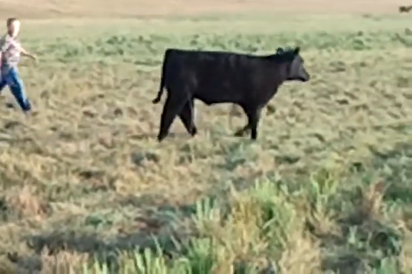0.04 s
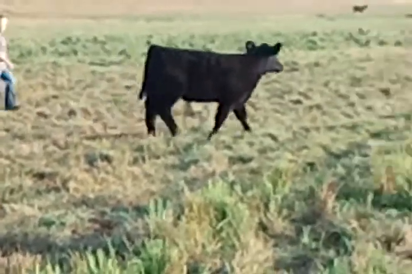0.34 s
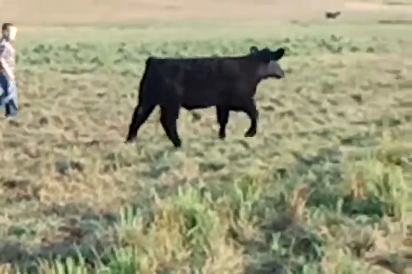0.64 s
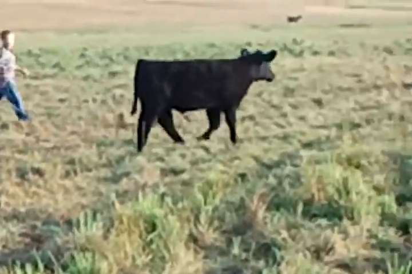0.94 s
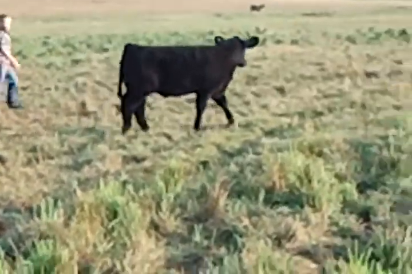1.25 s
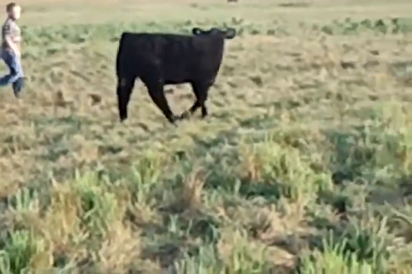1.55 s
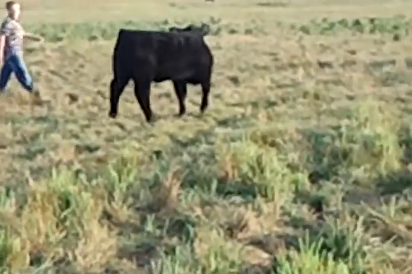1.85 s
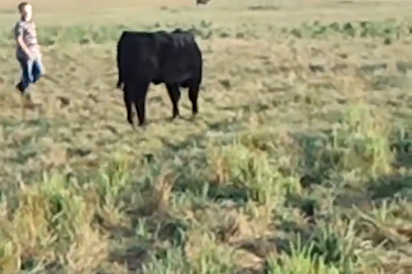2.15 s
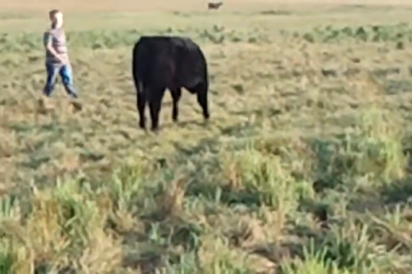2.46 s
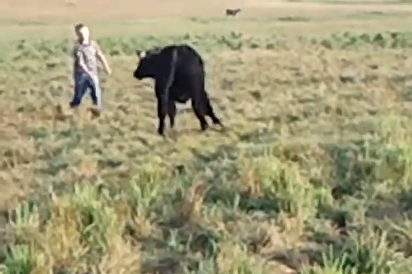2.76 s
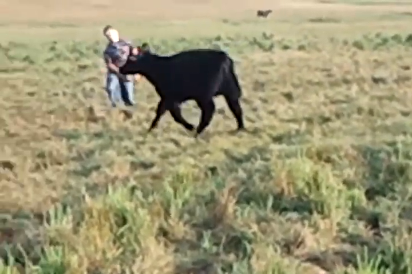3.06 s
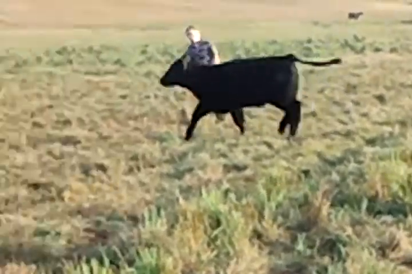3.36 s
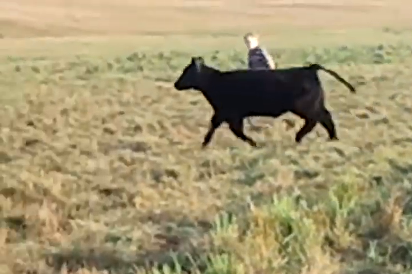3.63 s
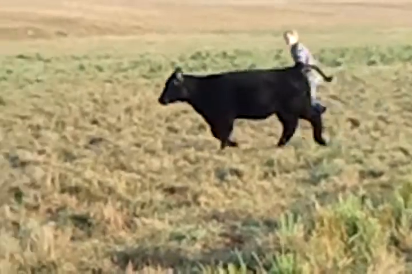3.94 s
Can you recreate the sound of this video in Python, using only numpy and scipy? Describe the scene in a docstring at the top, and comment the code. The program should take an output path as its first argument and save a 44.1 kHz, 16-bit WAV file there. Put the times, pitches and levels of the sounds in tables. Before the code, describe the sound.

Two cattle moo in an open pasture: a low raspy call, two higher, clearer calls with hoarse edges, then the low one again. Behind them are a steady high hiss, light wind and a soft, engine-like throb.

```python
"""Two cattle call in turn across an open pasture, twice each: one low and raspy, one higher and clearer.
Vocal-fold pulses and puffs of turbulence sound through the throat; each call rises, holds and sags.
The higher voice carries a nasal hum and breaks into a hoarse squeal at its ends.
Behind them: faint far moos, a steady high hiss, light wind that nudges the microphone once,
a low regular throb like a far idling engine, and one dry tick."""
import sys
import numpy as np
from scipy import signal
from scipy.fft import rfft, irfft, next_fast_len
from scipy.io import wavfile
from scipy.ndimage import map_coordinates

SR = 44100
rng = np.random.default_rng(int(sys.argv[2]) if len(sys.argv) > 2 else 0)


def master(y):
    """Save y as 16-bit WAV."""
    cut = np.clip(np.atleast_2d(y).T, -1, 1)
    pcm = np.round(cut * 32767)  # scale
    wavfile.write(sys.argv[1], SR, pcm.astype(np.int16))


N = 176400


def amp(db):
    """Decibels to gain."""
    return 10 ** (np.asarray(db) / 20)


def unit(x):
    """Scale to rms 1."""
    return x / np.sqrt(np.mean(x ** 2) + 1e-20)


def clock():
    """Sample times in seconds."""
    return np.arange(N) / SR


def along(points, hz):
    """Gain of (Hz, dB) points on a log axis."""
    point_hz, db = np.transpose(points)
    return amp(np.interp(np.log(hz + 1), np.log(point_hz + 1), db))


def peak(hz, centre_hz, half_width_hz):
    """Gain of one resonance."""
    return 1 / (1 + ((hz - centre_hz) / half_width_hz) ** 2)


def curves(rows):
    """One value per sample for each column after the time."""
    times_s, *columns = np.transpose(rows)
    return [np.interp(clock(), times_s, column) for column in columns]


def wobble(rate_hz):
    """Smooth random curve, rate_hz knots a second."""
    return map_coordinates(rng.standard_normal(4000), [clock() * rate_hz], mode="wrap")


def swell(start_s, length_s):
    """Half-sine rise and fall."""
    return np.sin(np.pi * np.clip((clock() - start_s) / length_s, 0, 1))


def filtered(x, gain):
    """Minimum-phase filter with the given gain over frequency."""
    size = 2 * next_fast_len(N // 2 + 8192)
    hz = np.fft.rfftfreq(size, 1 / SR)
    cepstrum = irfft(np.log(np.maximum(gain(hz), 1e-6)))
    cepstrum[1:size // 2] *= 2
    cepstrum[size // 2 + 1:] = 0
    return irfft(rfft(x, size) * np.exp(rfft(cepstrum)))[:N]


def noise(spectrum):
    """Coloured noise of rms 1."""
    return unit(filtered(rng.standard_normal(N), lambda f: along(spectrum, f)))


# Hiss colour (frequency [Hz], gain [dB])
HISS_SPECTRUM = [(1650, -39.5), (2800, -34), (3170, -21), (3540, -8.5), (3900, -5), (4140, 3), (4610, 7.5),
                 (5100, 4), (5610, -5.5), (6150, -0.5), (6630, -4.5), (6870, -4.5), (7270, -20),
                 (9450, -75.5), (16000, -120)]
# Hiss envelope (time [s], level [dB])
HISS_ENVELOPE = [(0.04, -47.5), (0.45, -51), (0.78, -52.5), (1.79, -57.5), (2.32, -57.5), (2.98, -54),
                 (3.28, -56), (3.96, -56)]


def hiss():
    """Continuous high band of noise."""
    return amp(curves(HISS_ENVELOPE)[0]) * noise(HISS_SPECTRUM)


# Moving air (frequency [Hz], gain [dB])
AIR_SPECTRUM = [(88, -29), (150, -6.5), (206, -7.5), (344, -7.5), (568, -11.5), (648, -12.5), (1270, -13.5),
                (1320, -13), (3500, -21), (4550, -30), (7700, -120)]
# Wind rumble (frequency [Hz], gain [dB])
RUMBLE_SPECTRUM = [(15, -3), (40, -5), (70, 5.5), (130, -6), (200, -18.5), (400, -37)]
# Envelope of air and rumble (time [s], gain [dB])
WIND_ENVELOPE = [(0, -48), (.5, -49), (.8, -54), (1.3, -55), (1.8, -58), (2.3, -58), (2.9, -54), (3.5, -56),
                 (4, -56)]


def wind():
    """Light wind: broad air noise over a fluctuating rumble."""
    envelope = amp(curves(WIND_ENVELOPE)[0] + 0.23 * wobble(21))
    rumble = amp(4 + 2 * wobble(10)) * noise(RUMBLE_SPECTRUM)
    return envelope * (noise(AIR_SPECTRUM) + rumble)


# Wind bump (frequency [Hz], gain [dB])
BUMP_SPECTRUM = [(30, -25.5), (140, -5), (250, -1.5), (400, -36.5), (800, -48)]


def wind_bump():
    """Wind nudges the microphone once."""
    return noise(BUMP_SPECTRUM) * amp(-49) * swell(start_s=0.355, length_s=0.1)


# Beat envelope (time [s], nominal peak [dB])
THROB_ENVELOPE = [(0, -43), (.6, -41), (1.1, -36), (1.5, -40.5), (2.6, -41), (4, -38)]
# Beat drift (time [s], lag [s])
THROB_DRIFT = [(0, -.003), (.4, -.01), (.9, -.002), (1.2, -.011), (1.55, -.015), (2, -.011), (3.1, .007),
               (3.5, -.006), (4, -.012)]
# Stronger thumps (time [s], peak [dB])
EXTRA_THUMPS = [(.076, -37), (.339, -39), (.428, -34), (1.06, -41), (3.922, -39)]


def throb(start_s=0.078, period_s=0.0897, pair_gap_s=0.018, tone_hz=70, sigma_s=0.0038):
    """Soft paired thumps, about eleven pairs a second, and a few stronger ones."""
    t, out, thumps = clock(), np.zeros(N), list(EXTRA_THUMPS)
    for k, (late, first, second) in enumerate(rng.standard_normal((44, 3))):
        at_s = start_s + k * period_s
        at_s += np.interp(at_s, *np.transpose(THROB_DRIFT)) + 0.001 * late
        db = np.interp(at_s, *np.transpose(THROB_ENVELOPE))
        thumps += [(at_s, db + 1.2 * first), (at_s + pair_gap_s, db - 1 + 2 * second)]
    for at_s, db in thumps:
        near = abs(t - at_s) < period_s / 2
        offset_s = t[near] - at_s
        window = np.exp(-(offset_s / sigma_s) ** 2 / 2)
        out[near] += amp(db) * window * np.cos(2 * np.pi * tone_hz * offset_s)
    return out


# Tick colour (frequency [Hz], gain [dB])
TICK_SPECTRUM = [(300, -11), (1000, -4), (2500, -25.5), (4000, 4), (5000, 2.5), (7000, -27)]


def tick(at_s=3.6055, level_db=-33, decay_s=0.0014):
    """One dry tick close by: a fast-decaying noise burst."""
    age_s = clock() - at_s
    return amp(level_db) * noise(TICK_SPECTRUM) * (age_s >= 0) * np.exp(-abs(age_s) / decay_s)


# Distant calls (start [s], length [s], start pitch [Hz], end pitch [Hz], peak [dB])
DISTANT_CALLS = [(1.444, 0.33, 348, 337, -61), (2.025, 0.22, 570, 600, -65), (2.17, 0.13, 590, 752, -63)]


def far_moos():
    """Faint wavering tones from animals far off."""
    out = np.zeros(N)
    for start_s, length_s, start_hz, end_hz, db in DISTANT_CALLS:
        glide_hz = np.interp(clock(), [start_s, start_s + length_s], [start_hz, end_hz])
        pitch_hz = glide_hz * (1 + 0.016 * wobble(43))
        out += amp(db) * swell(start_s, length_s) * np.sin(2 * np.pi * np.cumsum(pitch_hz) / SR)
    return out


def ground_scatter(x, t60_s=0.4, level_db=-14):
    """Weak scatter from the open ground."""
    t = np.arange(SR // 2) / SR
    tail = rng.standard_normal(len(t)) * amp(-60 * t / t60_s)
    return amp(level_db) * signal.fftconvolve(x, tail / np.linalg.norm(tail))[:N]


def gate(call, attack_s=0.017, release_s=0.026):
    """Linear attack before a call and release after it."""
    attack = np.clip(1 + (clock() - call[0][0]) / attack_s, 0, 1)
    release = np.clip(1 - (clock() - call[-1][0]) / release_s, 0, 1)
    return attack * release


def vocal_folds(pitch_hz, jitter, slack_jitter, waver=0.002):
    """Fold phase and slackness: the pitch wavers, and the cycles grow uneven as it sags."""
    slack = (1 - pitch_hz / pitch_hz.max()) * (np.arange(N) > pitch_hz.argmax())
    drift = waver * wobble(14) + (jitter + slack_jitter * slack) * wobble(170)
    return 2 * np.pi * np.cumsum(pitch_hz * (1 + drift)) / SR, slack


def pulses(phase, weight, count=18, swing_db=3.5):
    """Vocal pulses: harmonic k has nominal rms weight(k) and swings on its own in moving air."""
    harmonics = sum(weight(k) * amp(swing_db * wobble(11)) * np.cos(k * phase)
                    for k in range(1, count + 1))
    return np.sqrt(2) * harmonics * amp(1.4 * wobble(45))


def puffs(phase):
    """Turbulence let through once a cycle."""
    return unit(rng.standard_normal(N) * (1 + np.cos(phase)) ** 2)


# Breaks of the high voice (start [s], length [s], lower resonance [dB], upper resonance [dB])
VOICE_BREAKS = [(1.228, 0.15, -53, -60), (1.904, 0.77, -60, -67.5), (2.916, 0.12, -50, -58.5)]


def squeals(lower_hz=1232, upper_hz=2310):
    """Turbulence rings two throat resonances where the voice breaks."""
    lower = unit(filtered(rng.standard_normal(N), lambda f: peak(f, lower_hz, half_width_hz=50)))
    upper = unit(filtered(rng.standard_normal(N), lambda f: peak(f, upper_hz, half_width_hz=390)))
    return sum(swell(start_s, length_s) * (amp(lower_db) * lower + amp(upper_db) * upper)
               for start_s, length_s, lower_db, upper_db in VOICE_BREAKS)


# High calls, source levels
# (time [s], pitch [Hz], low harmonics [dB], treble [dB], hum [dB], throat resonance [Hz])
HIGH_CALL_1 = [(0.55, 186, -70, -70, -57, 1100), (0.68, 197, -63, -65, -55, 1100),
               (0.8, 208, -55.5, -58, -54, 1180), (0.915, 212.7, -52.5, -54.5, -53, 1170),
               (1.1, 213.7, -53, -51.5, -53, 1170), (1.195, 211.5, -51, -60, -52.5, 1060),
               (1.256, 207, -53, -61, -52, 1130), (1.3, 193, -57, -61, -64, 1190)]
HIGH_CALL_2 = [(2.0, 182, -81, -82, -73, 1230), (2.2, 189, -73, -73.5, -70, 1230),
               (2.33, 195.4, -70, -67, -56.5, 1230), (2.42, 203.5, -63, -71, -63, 1235),
               (2.47, 210.2, -56.5, -62, -55, 1140), (2.68, 213.7, -47.5, -57, -55.5, 1150),
               (2.79, 211.5, -47, -58.5, -53, 1130), (2.88, 209.8, -50, -62, -55, 1195),
               (2.94, 205, -51, -59, -58, 1235), (3.0, 191, -56, -60.5, -65.5, 1170)]
# Throat response (frequency [Hz], gain [dB])
HIGH_THROAT_RESPONSE = [(210, -24.5), (425, -30), (620, -19), (850, -18.5), (1060, -4), (1280, -5.5),
                        (1490, -8), (1700, -8), (1920, 0.5), (2130, -14), (2340, -4), (2560, -9.5),
                        (2800, -31.5), (3500, -35)]
# Rasp colour (frequency [Hz], gain [dB])
RASP_SPECTRUM = [(100, -8), (300, -39), (600, 1), (900, -8.5), (1220, 10), (1500, -5.5), (1800, 5.5),
                 (2350, -5.5), (2800, -12), (4000, -46)]


def high_call(call, rasp_db, rasp_growth, jitter, slack_jitter, treble_hz=1390, hum_third_db=-7):
    """Clear pulses over a nasal hum; the treble opens with the mouth and the rasp grows with it."""
    pitch_hz, low_db, treble_db, hum_db, resonance_hz = curves(call)
    phase, slack = vocal_folds(pitch_hz, jitter, slack_jitter)

    def weight(k):
        """The moving resonance lifts the overtone that it passes."""
        lift = 1 + 3.63 * peak(k * pitch_hz, resonance_hz, half_width_hz=59.6)
        return amp(low_db if k * pitch_hz.max() < treble_hz else treble_db) * lift

    voice = filtered(pulses(phase, weight), lambda f: along(HIGH_THROAT_RESPONSE, f))
    hum = amp(hum_db) * pulses(phase, lambda k: (k == 1) + (k == 3) * amp(hum_third_db), count=3)
    rasp_gain = amp(rasp_db + rasp_growth * (treble_db - treble_db.max()) + 5 * np.tanh(10 * slack))
    rasp = unit(filtered(puffs(phase), lambda f: along(RASP_SPECTRUM, f)))
    return gate(call) * (voice + hum + rasp_gain * rasp)


# Low calls (time [s], pitch [Hz], source level [dB])
LOW_CALL_1 = [(0.18, 134, -54), (0.215, 145, -48), (0.258, 156.6, -45), (0.31, 162.2, -43),
              (0.416, 166.1, -44), (0.536, 165.5, -45), (0.576, 163.2, -45), (0.6, 155.5, -47.5),
              (0.62, 144, -51), (0.64, 135, -60)]
LOW_CALL_2 = [(2.78, 135, -61), (2.86, 142.5, -68.5), (3.0, 157.7, -55.5), (3.1, 162.7, -55.5),
              (3.21, 164.4, -56.5), (3.3, 161.9, -57), (3.38, 156.5, -55), (3.425, 138, -70)]
# Throat response per call (frequency [Hz], gain [dB])
LOW_THROAT_1 = [(160, -8.5), (330, -39.5), (495, -27), (660, -7), (825, -6.5), (990, -13.5), (1160, -9),
                (1325, -2.5), (1490, -14.5), (1655, -4), (1825, -1.5), (1990, -8), (2150, -11.5),
                (2330, -15.5), (2600, -38.5), (3500, -37.5)]
LOW_THROAT_2 = [(160, 1.5), (325, -21), (490, -8.5), (655, 2), (820, -3.5), (985, -8.5), (1145, 2),
                (1310, -4.5), (1475, -10.5), (1640, -2.5), (1800, -4.5), (1960, -29), (2130, -14),
                (2500, -33), (3500, -35.5)]


def low_call(call, throat, rasp_ratio_db, slack_rasp_db, jitter, slack_jitter, uneven):
    """Pulses, at times alternately strong and weak, and rasp through one throat."""
    pitch_hz, source_db = curves(call)
    phase, slack = vocal_folds(pitch_hz, jitter, slack_jitter)
    voice = pulses(phase, lambda k: 1) * (1 + uneven * wobble(25) * np.cos(phase / 2))
    rasp = amp(rasp_ratio_db + slack_rasp_db * np.tanh(10 * slack)) * puffs(phase)
    source = (voice + rasp) * amp(source_db) * gate(call)
    return filtered(source, lambda f: along(throat, f))


def scene():
    """Four calls over the pasture, mono."""
    calls = low_call(LOW_CALL_1, LOW_THROAT_1, rasp_ratio_db=3, slack_rasp_db=8,
                     jitter=0.0063, slack_jitter=0.12, uneven=0.24)
    calls += low_call(LOW_CALL_2, LOW_THROAT_2, rasp_ratio_db=1.5, slack_rasp_db=-4,
                      jitter=0.0063, slack_jitter=0.03, uneven=0.11)
    calls += high_call(HIGH_CALL_1, rasp_db=-58, rasp_growth=0.13, jitter=0.0011, slack_jitter=0.047)
    calls += high_call(HIGH_CALL_2, rasp_db=-56, rasp_growth=0.4, jitter=0.0028, slack_jitter=0.2)
    calls += squeals()
    scatter = ground_scatter(calls)
    background = far_moos() + throb() + hiss() + wind() + wind_bump() + tick()
    return (calls + scatter + background)[None]


def record(dry):
    """Steep elliptic low-pass at the band limit."""
    cutoff_hz = 7350
    return signal.sosfilt(signal.ellip(10, 0.1, 90, cutoff_hz, fs=SR, output="sos"), dry)


dry = scene()
out = record(dry)
master(out)
```